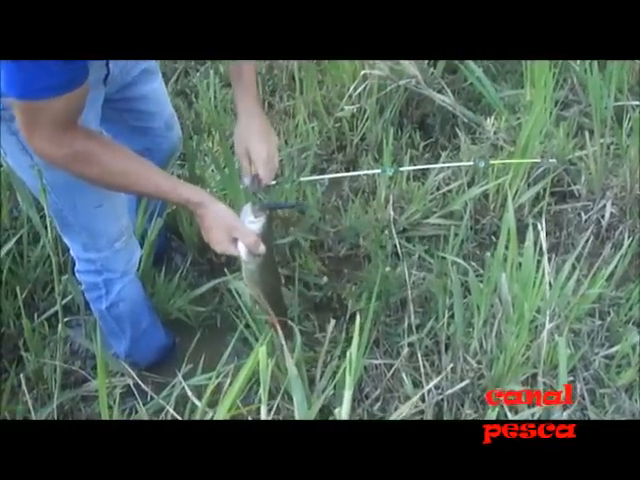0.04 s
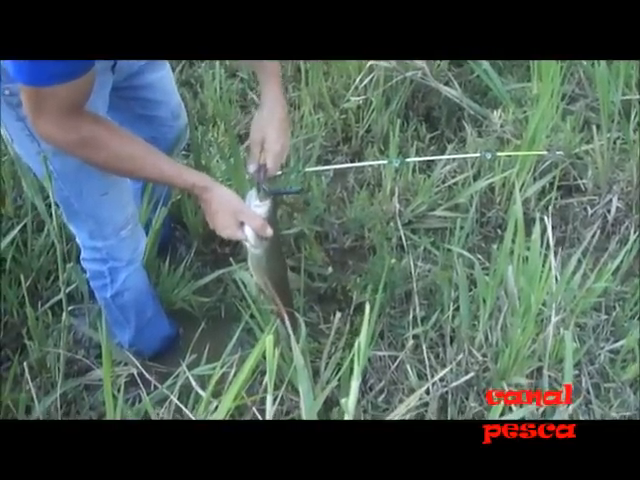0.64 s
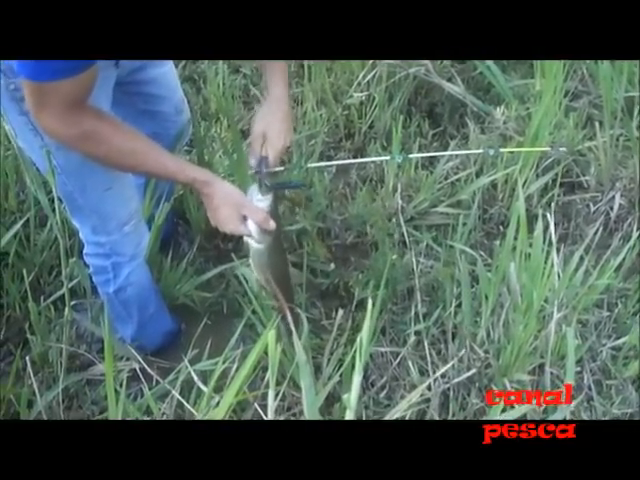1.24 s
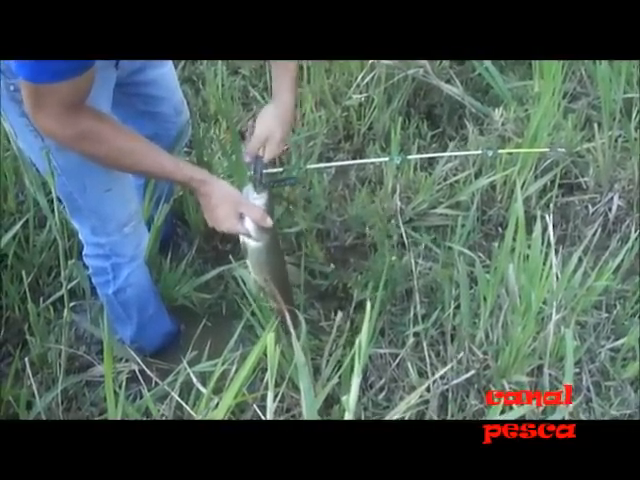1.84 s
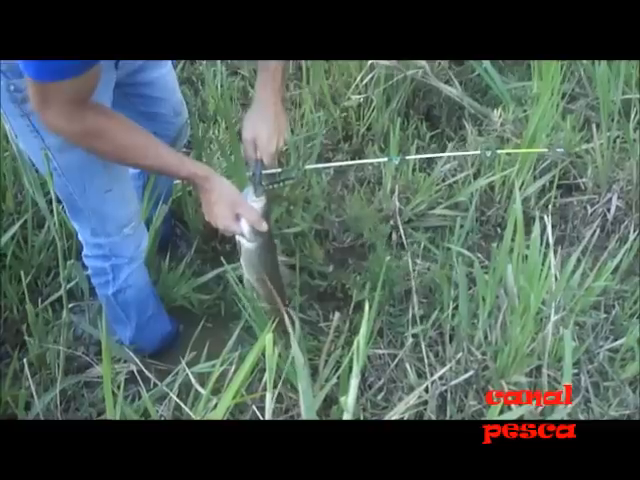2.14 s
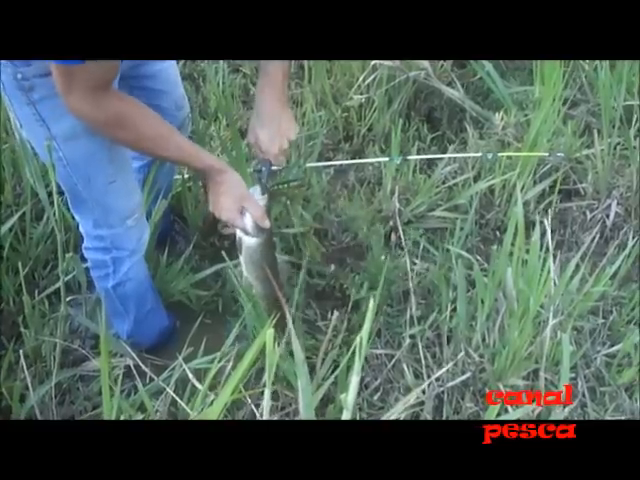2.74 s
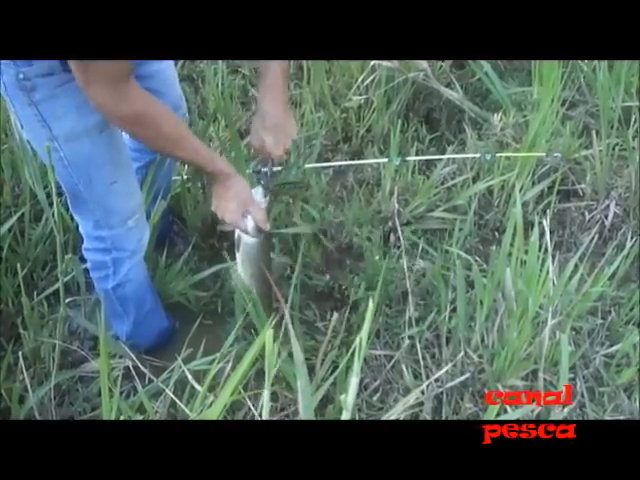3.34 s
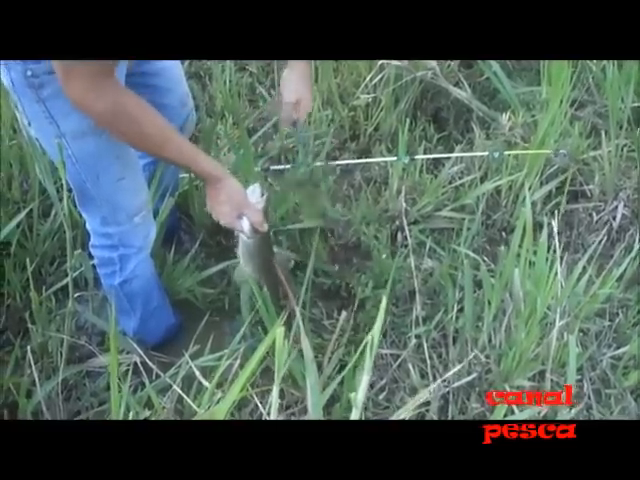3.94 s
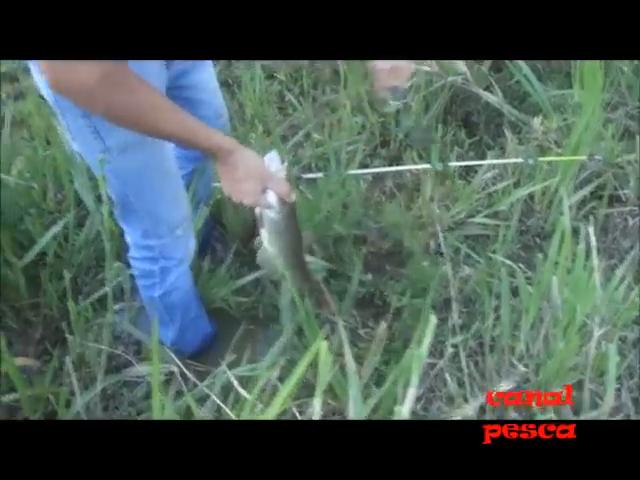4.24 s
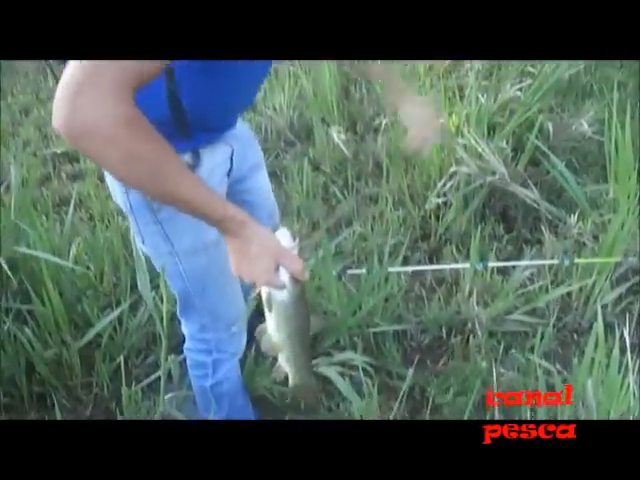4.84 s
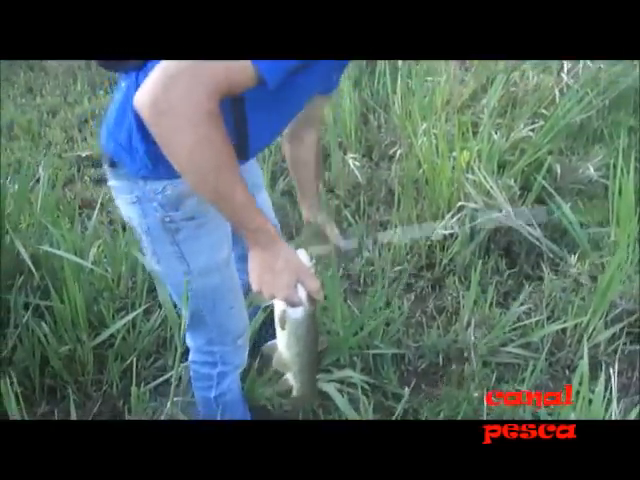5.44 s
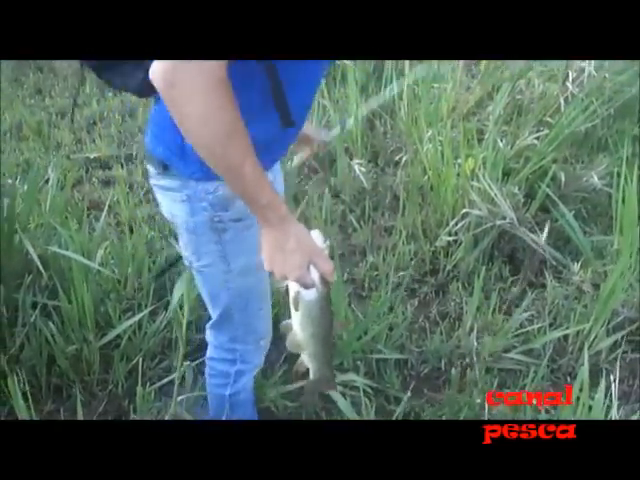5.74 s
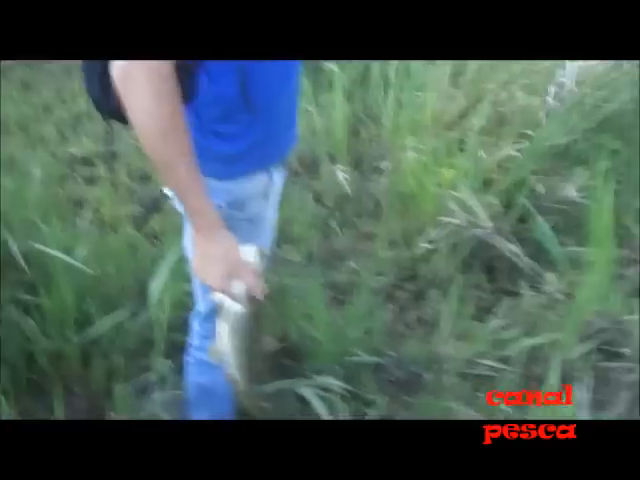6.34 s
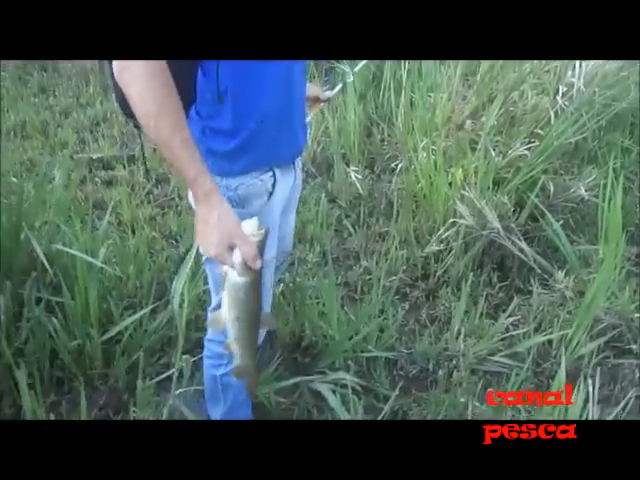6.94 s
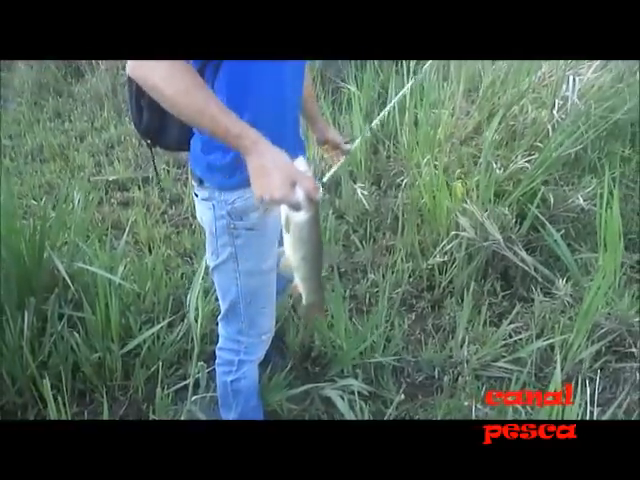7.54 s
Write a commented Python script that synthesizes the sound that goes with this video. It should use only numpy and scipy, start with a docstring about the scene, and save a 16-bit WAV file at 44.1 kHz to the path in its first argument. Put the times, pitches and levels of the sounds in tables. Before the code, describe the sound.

A steady, high chorus of crickets fills a marsh over a soft open-air hush, with small birds chirping faintly in the distance. Close to the microphone, fishing tackle clicks lightly and pliers snap shut once. More small clicks follow, then grass rustles softly and boots squelch in wet ground while a far bird warbles. Near the end a dry stem cracks and the tackle knocks once.

```python
"""Angler in a cricket marsh

Crickets trill with their wings while small birds whistle far off, over a soft open-air hush.
Close by, an angler unhooks a fish with pliers, picks up the rod and steps through the grass:
the pliers snap, stems crackle, boots squelch and the tackle knocks once.
The hard hits ring as damped modes; rustles and squelches are swarms of tiny ticks."""
import sys
import numpy as np
from scipy import signal
from scipy.fft import rfft, irfft
from scipy.io import wavfile
from scipy.ndimage import uniform_filter1d

SR = 44100
rng = np.random.default_rng(int(sys.argv[2]) if len(sys.argv) > 2 else 0)


def master(y):
    """Save y as 16-bit WAV."""
    cut = np.clip(np.atleast_2d(y).T, -1, 1)
    pcm = np.round(cut * 32767)  # scale
    wavfile.write(sys.argv[1], SR, pcm.astype(np.int16))


N = 334278
TIME = np.arange(N) / SR
HIT_TIME = np.arange(SR // 10) / SR
TOP_HZ = 11080


def trill(hz, fall_hz, strokes_per_s, duty, drift=.004, waver_hz=12, uneven_db=1.14):
    """Each closing stroke of the wings rings one tone, which sinks as the scraper slows."""
    strokes = np.cumsum(strokes_per_s * (1 + drift * wander(3))) / SR + rng.random()
    closing = np.minimum(strokes % 1 / duty, 1)
    pitch = hz - fall_hz * (closing ** 2 - .5 ** 2) + waver_hz * wander(30)
    strength = amp(uneven_db * wander(20)) * np.sin(np.pi * closing)
    return unit(strength * np.sin(2 * np.pi * np.cumsum(pitch) / SR))


# Near crickets. Each row: mid-stroke pitch in Hz, fall over a stroke in Hz, strokes per second.
SINGERS = [(5480, 280, 28.2), (5190, 100, 25.6), (5300, 110, 27.0), (5525, 70, 26.9), (5700, 300, 29.0),
           (5990, 80, 31.7), (5020, 340, 25.6), (5620, 200, 22.6)]
# Their balance: one relative level in dB per cricket.
SINGER_DB = [-55, -56.5, -55.5, -57, -58.5, -61, -64.5, -62]
# The blur of far crickets. Each row: frequency in Hz, relative level in dB.
FAR_SPECTRUM = [(4300, -58), (4700, -17), (4880, -5), (5150, -3), (5400, 0), (5650, 1), (5900, -5.5),
                (6120, -11), (6500, -14), (7000, -18.5), (7600, -36)]
# The chorus's level, with gentle dips; the recorder's gain ducks just after the knock.
# Each row: time in seconds, gain in dB.
CHORUS_LEVEL = [(0, -0.8), (4.5, -0.5), (5.5, -2.5), (6.6, -1), (7.1, -1.8), (7.58, -0.6)]


def cricket_chorus():
    """A few near singers, each with its own echo from the reeds, over a blur of far ones."""
    near = sum(amp(db) * unit(scatter(trill(*singer, duty=.65), t60=.3, wet_db=-9))
               for singer, db in zip(SINGERS, SINGER_DB))
    far = amp(-52.5) * coloured_noise(FAR_SPECTRUM)
    gain_db = np.interp(TIME, *np.transpose(CHORUS_LEVEL)) + .42 * wander(6)
    return (near + far) * amp(gain_db)


def high_cricket(start_s=1.25, fade_s=.4):
    """One thin, high cricket joins in and keeps going."""
    fade_in = np.clip((TIME - start_s) / fade_s, 0, 1)
    return amp(-74) * trill(hz=7560, fall_hz=120, strokes_per_s=40.8, duty=.6) * fade_in


def blow(modes, rise_s, chatter_db, chatter_hz, chatter_t60):
    """Damped modes set off together, with a brief chatter of the parts in contact."""
    ring = sum((-1) ** k * amp(db) * decay(t60) * np.sin(2 * np.pi * hz * HIT_TIME)
               for k, (hz, db, t60) in enumerate(modes))
    chatter = band(rng.standard_normal(len(HIT_TIME)), chatter_hz, 1) * decay(chatter_t60)
    hit = (ring + amp(chatter_db) * chatter) * (1 - np.exp(-HIT_TIME / rise_s))
    return signal.lfilter(*signal.butter(3, 100, "high", fs=SR), hit)  # small things radiate little bass


# How each object rings. Each row: frequency in Hz, relative level in dB, 60 dB decay in seconds.
PLIER_MODES = [(1205, -26.5, 0.023), (1940, -24.5, 0.012), (2320, -23, 0.0077), (2790, -26.5, 0.013),
               (3730, -19.5, 0.0064), (4534, -28, 0.029), (5530, -13.5, 0.014), (6160, -23, 0.026),
               (7760, -17, 0.0029)]
STEM_MODES = [(1320, -22, 0.0028), (2240, -19.5, 0.004), (3570, -16, 0.0028), (6130, -13, 0.0014),
              (8250, -19, 0.0027), (11000, -22, 0.0027)]
TACKLE_MODES = [(186, -37, 0.024), (340, -29.5, 0.021), (544, -26.5, 0.027), (900, -26, 0.023),
                (1080, -30.5, 0.024), (1370, -28, 0.043), (1690, -31, 0.016), (2460, -23, 0.017),
                (3220, -17, 0.0082), (3800, -16.5, 0.0077), (7800, -17.5, 0.0033), (10100, -11, 0.0012)]


def blows():
    """The pliers snap shut, a dry stem breaks, the tackle knocks."""
    snap = blow(PLIER_MODES, rise_s=.0002, chatter_db=-36.5, chatter_hz=4400, chatter_t60=.091)
    crack = blow(STEM_MODES, rise_s=.00003, chatter_db=-31.5, chatter_hz=3500, chatter_t60=.012)
    knock = blow(TACKLE_MODES, rise_s=.0001, chatter_db=-26, chatter_hz=1390, chatter_t60=.026)
    return place([(2.4267, amp(2) * snap), (6.3116, amp(1) * crack), (7.0331, amp(1.5) * knock)])


# Low weight under the blows and a footfall. Each row: start in seconds, level in dB.
THUD_HITS = [(2.427, -62), (2.464, -64), (6.312, -71), (6.346, -65), (6.37, -62), (7.033, -59)]


def thuds(hz=112, t60=.15):
    """The dull push of air and soft ground."""
    t = np.arange(SR // 5) / SR
    return place((start, amp(db) * band(rng.standard_normal(len(t)), hz, .62) * decay(t60, t))
                 for start, db in THUD_HITS)


# Hook, tackle and stem clicks. Each row: start in seconds, then woody, hollow and bright mix in dB.
CLICK_HITS = [(1.6447, -47.5, -54, -44), (1.7147, -38, -41, -43), (1.736, -46, -55, -58),
              (1.9457, -44, -59, -60), (2.4641, -44, -36.5, -35), (2.5415, -40.5, -35.5, -41),
              (3.0647, -40.5, -36.5, -43), (3.3294, -36.5, -36, -47), (3.344, -34.5, -37, -42),
              (3.4234, -36, -48, -45), (3.5037, -42, -45.5, -53), (4.0827, -46.5, -53, -45),
              (4.372, -40, -49, -40), (4.414, -47, -48, -43.5), (4.4422, -40.5, -51, -58),
              (4.642, -56, -59, -36.5), (4.6503, -43.5, -60, -32.5), (4.8889, -38.5, -45, -42),
              (5.2714, -44, -59, -51), (5.3504, -41.5, -50, -58), (6.1216, -36, -44, -46),
              (6.2808, -44, -47, -54), (6.3608, -38, -45, -45), (6.5267, -43, -58, -40),
              (6.74, -43, -51, -57), (6.774, -34.5, -45, -44.5), (6.9485, -36.5, -63, -48)]
# The tackle's colour on every click. Each row: centre in Hz, width in octaves, relative level in dB.
TACKLE_BANDS = [(1715, 0.23, -3), (2670, 0.13, -2.5), (3920, 0.1, -1.5)]


def clicks(t60=.033, rise_s=.00067):
    """Each click is a tiny crunch: a woody middle, a hollow ring and a bright edge."""
    envelope = decay(t60) * (1 - np.exp(-HIT_TIME / rise_s))
    events = []
    for start, woody_db, hollow_db, bright_db in CLICK_HITS:
        noise = rng.standard_normal((3, len(HIT_TIME)))
        body = sum(amp(db) * band(noise[0], hz, octaves) for hz, octaves, db in TACKLE_BANDS)
        woody = amp(woody_db - 1) * unit(body)
        bright = amp(bright_db - 1) * band(noise[1], 6540, .38)
        hollow = amp(hollow_db - 2) * band(noise[2], 1162, .076)
        events.append((start, (woody + bright + hollow) * envelope))
    return place(events)


# Flicks of dry grass. Each row: start in seconds, level in dB.
BLADE_FLICKS = [(.474, -51), (.733, -52), (.754, -51), (1.527, -50), (2.622, -45), (4.828, -46)]


def blade_ticks(hz=8270, t60=.025):
    """A dry blade flicks with a faint, bright tick."""
    return place((start, amp(db) * band(rng.standard_normal(len(HIT_TIME)), hz, .2) * decay(t60))
                 for start, db in BLADE_FLICKS)


# Grass and cloth brushing, pliers and tackle scraping.
# Each row: start in seconds, length in seconds, level in dB, centre in Hz, width in octaves.
RUSTLE_STROKES = [(1.71, .03, -53, 1800, 0.25), (2.433, .03, -47, 6530, 0.074),
                  (3.262, 0.057, -51, 2870, 0.16), (3.265, 0.13, -53, 1225, .07),
                  (3.325, .08, -53.5, 4130, .11), (4.117, 2.9, -61.5, 1110, 1.08),
                  (4.325, 0.18, -56.5, 3300, .89), (4.639, 0.03, -49.5, 3860, 0.21),
                  (5.235, 0.12, -56.5, 780, 0.67), (5.208, 0.37, -61.5, 5510, 0.74),
                  (5.463, 0.5, -56.5, 5500, 0.88), (6.342, .051, -57, 258, 0.93),
                  (6.348, 0.11, -63, 3200, .58), (6.73, 0.065, -51, 2460, 0.051)]
# Boots in wet ground. Each row: start in seconds, level in dB.
BOOT_SQUELCHES = [(5.23, -58.5), (5.298, -52), (5.988, -46)]


def rustles_and_squelches(grains_per_s=2000, spread_db=3, squelch_s=.032, squelch_hz=1110):
    """Blades, metal and mud slip and give way in many tiny ticks of uneven size."""
    grains = rng.choice([-1, 1], N) * amp(spread_db * np.minimum(rng.exponential(1, N), 4))
    grains *= rng.random(N) < grains_per_s / SR
    grains *= amp(2.3 * wander(25))  # blades catch and let go
    squelches = [(start, squelch_s, db, squelch_hz, .22) for start, db in BOOT_SQUELCHES]
    events = []
    for start, length, db, hz, octaves in [*RUSTLE_STROKES, *squelches]:
        stroke = band(grains[int(start * SR):][:int(length * SR)], hz, octaves)
        events.append((start, amp(db) * stroke * signal.windows.tukey(len(stroke), .5)))
    return place(events)


def whistle(hz, flutter_db=1.8, rasp=.0047, taper=.25):
    """A bird's note swells, holds and fades, a little unsteady in pitch and strength."""
    pitch = hz * (1 + rasp * wander(300, size=len(hz)))
    strength = signal.windows.tukey(len(hz), taper) * amp(flutter_db * wander(70, size=len(hz)))
    return strength * np.sin(2 * np.pi * np.cumsum(pitch) / SR)


def glide(length, hz, octaves, hook=0):
    """A note slides through its middle pitch; a hook bends both ends up by that many octaves."""
    sweep = np.linspace(-1, 1, int(length * SR))
    return whistle(hz * 2 ** (octaves * sweep / 2 + hook * sweep ** 2))


# Quick downward chirps. Each row: start in seconds, length in seconds, middle pitch in Hz, level in dB.
FALLING_CHIRPS = [(.088, .058, 2800, -60.5), (1.303, .04, 3930, -58.5), (1.397, .054, 2980, -58),
                  (2.315, .056, 2880, -63), (3.818, .037, 3900, -59.5), (4.517, .048, 2820, -63),
                  (5.421, .058, 2860, -58), (6.134, .06, 2750, -52.5), (7.162, .068, 2760, -56.5)]
# Upward chirps. Each row: start in seconds, middle pitch in Hz, level in dB.
RISING_CHIRPS = [(.833, 3030, -60.5), (1.628, 2750, -63.5), (6.367, 2820, -58)]
# Low, slowly sinking whistles. Each row: start in seconds, length in seconds, level in dB.
SINKING_NOTES = [(1.733, .23, -70), (4.72, .09, -69), (6.518, .21, -66)]


def bird_calls():
    """Small birds slide single notes down or up."""
    falling = [(start, amp(db) * glide(length, hz, octaves=-.49, hook=.04))
               for start, length, hz, db in FALLING_CHIRPS]
    rising = [(start, amp(db) * glide(.046, hz, octaves=.37)) for start, hz, db in RISING_CHIRPS]
    sinking = [(start, amp(db) * glide(length, hz=1790, octaves=-.865 * length))
               for start, length, db in SINKING_NOTES]
    return place(falling + rising + sinking)


def arched_whistle(start_s=4.21, length_s=.5, crest_s=4.48, crest_hz=3235, sag_hz_per_s2=13500):
    """One long bird note climbs to a crest and sags away."""
    t = start_s + np.arange(0, length_s, 1 / SR)
    pitch = crest_hz - sag_hz_per_s2 * (t - crest_s) ** 2
    return place([(start_s, amp(-61.5) * whistle(pitch, taper=.4))])


# The syllable's melody. Each row: time from its crest in seconds, pitch in Hz.
SYLLABLE_PITCH = [(-.07, 2190), (-.042, 1980), (0, 2587), (.045, 2090), (.07, 1850), (.1, 1880)]
# The song. Each row: crest time, lead-in and run-out in seconds, opening pitch in Hz, level in dB.
WARBLER_SONG = [(5.057, 0.09, 0.053, 1960, -60), (5.287, .12, 0.1, 2220, -59.5),
                (5.585, 0.1, 0.066, 2010, -58), (5.824, 0.13, 0.092, 2240, -58.5)]


def warbler():
    """A syllable that dips, peaks and falls is sung four times."""
    events = []
    for crest, lead, run_out, opening_hz, db in WARBLER_SONG:
        melody = np.transpose([(-lead, opening_hz), *SYLLABLE_PITCH])
        pitch = np.interp(np.arange(-lead, run_out, 1 / SR), *melody)
        events.append((crest - lead, amp(db) * whistle(uniform_filter1d(pitch, size=600))))
    return place(events)


# Bursts of insect buzz. Each row: start in seconds, level in dB.
BUZZ_BURSTS = [(-.08, -72), (.844, -68), (1.68, -67), (3.5, -71), (4.298, -65), (6.792, -64)]


def insect_buzz(hz=4400, length_s=.24):
    """A soft, narrow buzz comes and goes."""
    swell = signal.windows.tukey(int(length_s * SR), .5)
    return place((start, amp(db) * band(rng.standard_normal(len(swell)), hz, .03) * swell)
                 for start, db in BUZZ_BURSTS)


# The tone of the open-air bed. Each row: frequency in Hz, relative level in dB.
HUSH_SPECTRUM = [(25, -20), (60, -23), (120, -12), (250, -4), (450, -1), (900, -1.5), (1320, -1.5),
                 (1650, -4.5), (3000, -7), (3700, -9), (4400, -3.5), (6500, -7.5), (8000, -14),
                 (10300, -12.5), (10900, -8.5)]


def air():
    """Far wind and insects merge into a hush that drifts in soft patches."""
    hz = np.fft.rfftfreq(1024, 1 / SR)
    real, imag, patches = rng.standard_normal((N // 256 + 5, len(hz), 3)).T
    patches = uniform_filter1d(patches, size=14, axis=0)  # smooth across frequency
    patch_db = unit(uniform_filter1d(patches, size=16, axis=1))  # and over time
    tone_hz, tone_db = np.transpose(HUSH_SPECTRUM)
    bed_db = np.interp(np.log(hz + 1), np.log(tone_hz), tone_db)[:, None]
    frames = (real + 1j * imag) * amp(bed_db + patch_db) * (hz < TOP_HZ)[:, None]
    hush = signal.istft(frames, nperseg=1024, noverlap=768)[1][:N]
    return amp(-56 + .44 * wander(3)) * unit(hush)


def scatter(x, t60, wet_db):
    """Adds the diffuse echo of reeds and trees."""
    t = np.arange(SR // 2) / SR
    tail = rng.standard_normal(len(t)) * decay(t60, t)
    return x + amp(wet_db) * signal.oaconvolve(x, tail / np.linalg.norm(tail))[:N]


def amp(db):
    """Decibels to gain."""
    return 10 ** (np.asarray(db) / 20)


def unit(x):
    """Scales to an RMS of one."""
    return x / np.sqrt(np.mean(x ** 2) + 1e-20)


def decay(t60, t=HIT_TIME):
    """A fade of 60 dB every t60 seconds."""
    return 1000 ** (-t / t60)


def place(events):
    """Lays (start in seconds, sound) pairs on one track; negative starts play at zero."""
    track = np.zeros(N)
    for start, sound in events:
        part = track[max(round(start * SR), 0):][:len(sound)]
        part += sound[:len(part)]
    return track


def wander(top_hz, size=N):
    """A smooth random curve of about unit size."""
    t = np.arange(0, size + 128, 64) / SR
    slow = sum(np.sin(2 * np.pi * (hz * t + rng.random())) for hz in top_hz * np.geomspace(.1, 1, 10))
    return np.interp(np.arange(size) / SR, t, slow / np.sqrt(5))


def band(x, hz, octaves):
    """Keeps a bell-shaped band around hz, at unit level."""
    freqs = np.fft.rfftfreq(len(x), 1 / SR)
    bell = np.exp(-(np.log2((freqs + 1) / hz) / octaves / 2) ** 2)
    return unit(irfft(rfft(x) * bell, len(x)))


def coloured_noise(spectrum):
    """Steady noise of unit level with the given spectrum."""
    db = np.interp(np.fft.rfftfreq(N, 1 / SR), *np.transpose(spectrum), left=-100, right=-100)
    return unit(irfft(rfft(rng.standard_normal(N)) * amp(db), N))


def scene():
    """The angler close and nearly dry, the birds far and echoing, alike in both channels."""
    angler = blows() + thuds() + clicks() + blade_ticks() + rustles_and_squelches()
    angler = scatter(angler, t60=.11, wet_db=-23)
    insects = cricket_chorus() + high_cricket() + insect_buzz()
    birds = scatter(bird_calls() + arched_whistle() + warbler(), t60=.35, wet_db=-3.5)
    return np.tile(insects + angler + birds + air(), (2, 1))


def record(dry):
    """A steep low-pass takes off the highest treble."""
    lowpass = signal.firwin(801, TOP_HZ, window=("kaiser", 8), fs=SR)
    return signal.oaconvolve(dry, lowpass[None], "same")


dry = scene()
out = record(dry)
master(out)
```